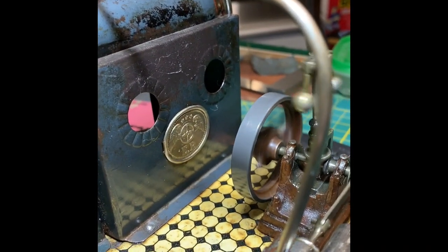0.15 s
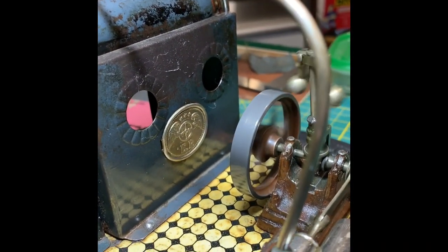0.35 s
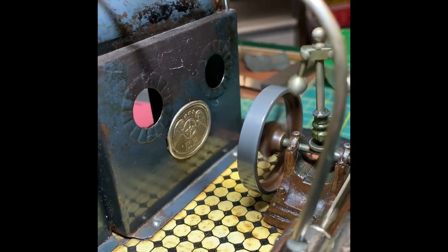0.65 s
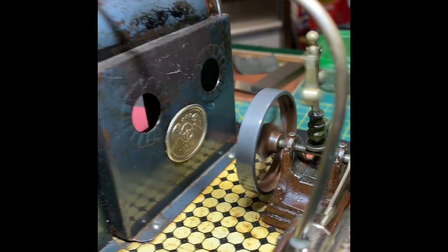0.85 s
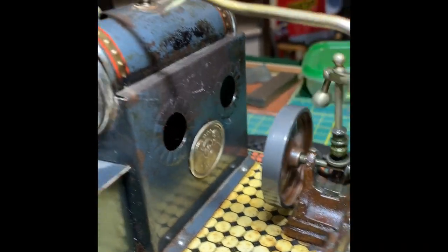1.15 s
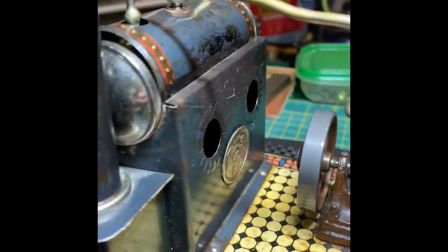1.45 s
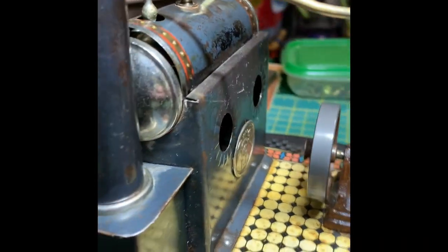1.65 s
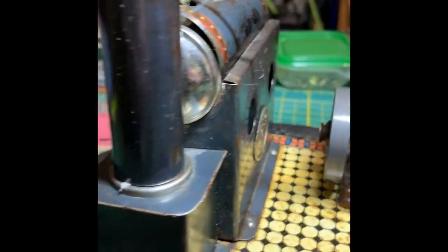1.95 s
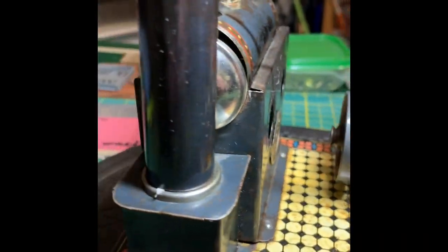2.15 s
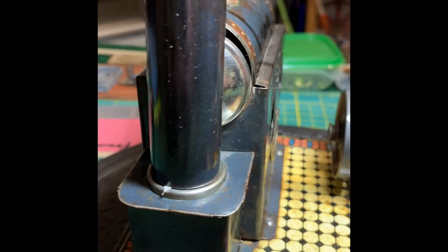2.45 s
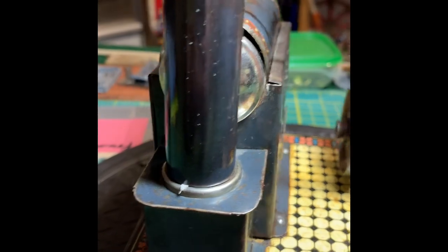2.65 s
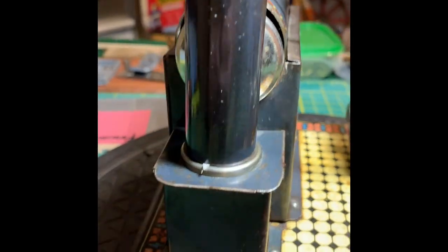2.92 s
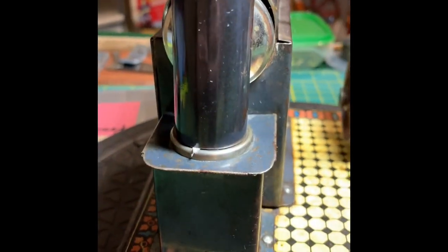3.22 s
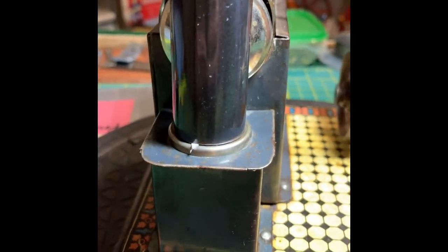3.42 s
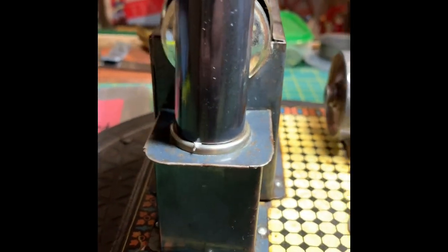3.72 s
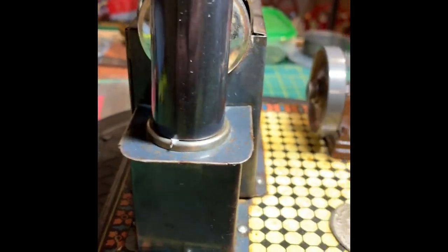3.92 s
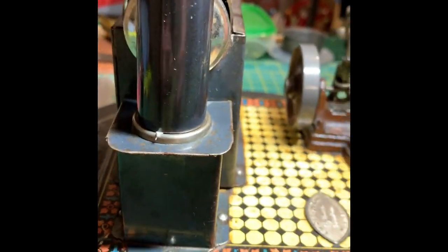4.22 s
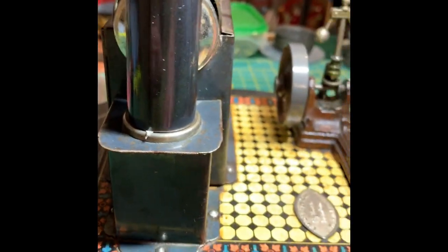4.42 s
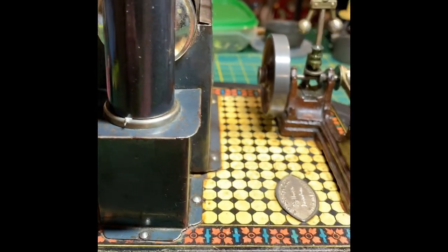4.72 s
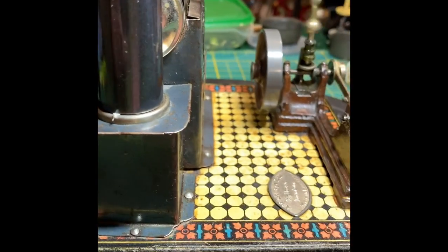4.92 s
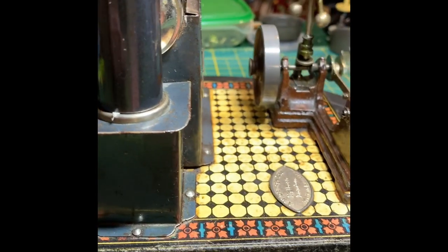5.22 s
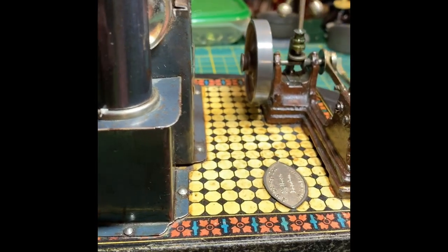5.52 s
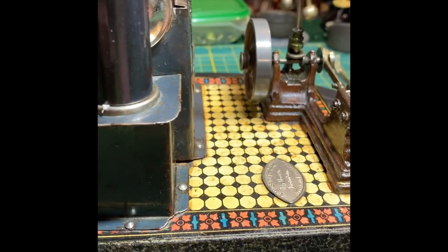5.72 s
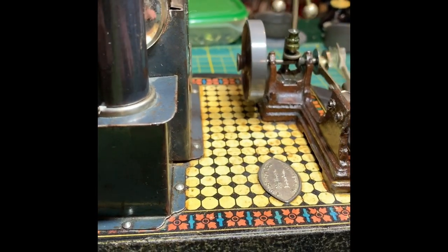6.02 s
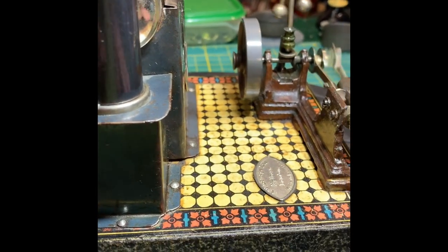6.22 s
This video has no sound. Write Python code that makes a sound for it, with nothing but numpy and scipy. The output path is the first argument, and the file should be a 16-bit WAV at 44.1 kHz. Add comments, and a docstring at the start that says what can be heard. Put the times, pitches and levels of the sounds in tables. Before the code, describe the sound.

Rapid, even metallic knocks and hissing puffs of air from a toy steam engine running close by on a workbench.

```python
"""A toy steam engine runs on compressed air on a workbench, at about 15 turns a second. In every turn the loose
crank knocks and rings the tin base, the exhaust lets out a chuff of air, the valve spits and the bench takes a
soft thump. Under it lie a steady leak, a low rumble and a few faint low tones. A stereo microphone moves from
beside the boiler to behind the chimney."""
import sys
import numpy as np
from scipy import signal
from scipy.fft import rfft, irfft, next_fast_len
from scipy.io import wavfile
from scipy.ndimage import uniform_filter1d, minimum_filter1d, map_coordinates

SR = 44100
rng = np.random.default_rng(int(sys.argv[2]) if len(sys.argv) > 2 else 0)


def wrap_up_sound(samples):
    """Save the sound to the file named by the first command line argument, as 16-bit audio."""
    columns = np.atleast_2d(samples).T
    # keep every value between -1 and 1, then stretch to whole-number steps
    tamed = np.clip(columns, -1, 1)
    steps = np.round(tamed * 32767).astype(np.int16)
    wavfile.write(sys.argv[1], SR, steps)


N = 280917

# How fast the flywheel spins. Each row: time in seconds, turns per second.
FLYWHEEL_SPEED = [(0.0, 15.2), (0.067, 15.448), (0.786, 14.935), (2.842, 15.132), (4.112, 14.891),
                  (4.848, 15.013), (5.076, 15.214), (5.912, 14.804)]
# The microphone's path. Each row: time in seconds, place (0 beside the boiler, 1 behind the chimney),
# distance in metres.
MIC_PATH = [(0, 0, 0.17), (1, 0.1, 0.22), (1.8, 0.81, 0.2), (3.2, 1, .2), (4.6, 0.92, 0.27), (5.1, 1, 0.24),
            (6.3, 0.94, 0.26)]
# The steady leak and the workshop's rumble. Each row: frequency in Hz, level in dB.
AIR_COLOUR = [(25, 0.5), (38, -4), (58, 5.5), (120, -3.5), (160, -7), (250, -5), (600, -5.5), (1000, -9.5),
              (2000, -10.5), (2700, -17), (3800, -17.5), (6000, -29), (10000, -20.5), (16000, -50)]
# A few faint, steady low tones. Each row: pitch in Hz, level in dB.
HUM_TONES = [(302, -44.5), (360, -46), (436, -48.5)]
# The hits of rod, crank and bearings in one turn. Each row: delay from the turn's start in seconds,
# level in dB, brightness in dB per octave.
CRANK_HITS = [(-.0248, -26, 4.5), (-.01708, -20, 5), (-.00941, -10, 2.5), (-.00735, -5, -3),
              (-.00483, -11, -3), (-.00371, 1.06, 1.63), (.00301, -12, 1.7), (.02353, -27, -8.5)]
# A few high tones that ring on after each hit. Each row: pitch in Hz, width in Hz (narrow rings longer), level
# in dB.
HIGH_RINGS = [(1970, 14, 5), (3680, 43, 0), (3788, 7.1, 4.5), (3830, 10, -2), (4773, 120, 0),
              (6910, 79, 2)]
# How the tin base and boiler house ring. Each row: pitch in Hz, width in Hz, level in dB beside
# the boiler, level in dB behind the chimney.
TIN_TONES = [(194.4, 31, 0, 2.5), (323.6, 99, -8.5, -1.2), (341.5, 49, -8.5, 0), (435.9, 17.3, 10, 12.5),
             (526, 209, 11, 11.5), (546.7, 121.3, 16, 15.5), (655.6, 40, 20, 18.5), (797.2, 59.6, 7.5, 6),
             (934.5, 38.6, 4, 0.7), (1101, 20, -15, -1), (1172, 52, 0.5, 1.5), (1288.5, 42, -3, 7.5),
             (1560, 37.4, 3.5, 2.5), (1724, 16.6, 1.5, 0.5), (1834, 158, 3, -0.5), (1872, 16, 1, -2.5),
             (1954, 63, -31, -8), (2161, 111, 10.5, 3), (2227, 105, 2.5, -8)]
# The exhaust's first burst, main rush and last leak. Each row: delay from the turn's start in seconds,
# level in dB, then rise, hold and fall in seconds.
EXHAUST_PUFFS = [(-.0042, -2, .008, 0.00046, 0.01), (-.0035, -7, 0.035, 0.014, 0.044),
                 (.0325, -24, 0.021, .003, 0.073)]
# The exhaust's hiss. Each row: frequency in Hz, level in dB.
CHUFF_COLOUR = [(250, -15), (450, -1), (620, 0), (1000, -8), (2050, -8), (2450, -8), (3800, -12),
                (5200, -8), (6300, -2.5), (7000, -4.5), (9000, -9), (11000, -13), (14000, -12),
                (16000, -22.5)]
# How that hiss changes behind the chimney. Each row: frequency in Hz, change in dB.
CHIMNEY_SHADE = [(2500, 0), (3800, -0.5), (4700, 1), (5600, -2), (7000, -4.5), (10000, -2), (14000, -4.5)]
# The valve's one jet per turn. Its row reads like those of EXHAUST_PUFFS.
VALVE_PUFFS = [(.0178, 0, .0035, .0017, .0065)]
# The valve's hiss. Each row: frequency in Hz, level in dB.
SPIT_COLOUR = [(2000, -20.5), (5000, -20.5), (7000, -15.5), (8500, -11.5), (9700, -0.8), (11000, -2.5),
               (12500, -6.5), (14000, -14), (15200, -19), (16500, -38)]
# Spits that stand out, nearly all louder. Each row: time in seconds, change in dB.
SPIT_ACCENTS = [(1.35, 2.5), (1.94, 3.5), (3.94, 6.5), (4.81, 4.5), (5.27, 3.5), (5.8, -1), (6.14, 1.5)]
# How the bench top booms. Each row: pitch in Hz, width in Hz, level in dB.
BENCH_TONES = [(72.5, 22.5, 6.5), (109.8, 15.3, 2.5), (204, 18, -2)]
# How much louder the microphone's left side is. Each row: frequency in Hz, left minus right in dB.
LEFT_LOUDER = [(60, -1), (110, 0), (200, -1), (380, -1.5), (700, -7), (1290, -4), (2380, -0.5), (4400, 0.5),
               (8120, 0), (15000, 0.5)]
# How far the wave on the left runs ahead. Each row: frequency in Hz, lead in radians.
LEFT_AHEAD = [(0, 0), (400, -.3), (860, -1), (1120, -.1), (2150, 1), (2410, 2), (3270, 1.9), (3790, 1.1),
              (4600, 1.9), (5400, 3.1), (7670, 6), (9000, 6.6), (11700, 9.4), (13000, 10.5), (14500, 12.3),
              (16200, 12.7)]
# The workshop's echo. Each row: frequency in Hz, seconds to fade by 60 dB.
ROOM_FADE = [(150, 0.14), (1500, 0.13), (12000, 0.067)]


def amp(db):
    """Turn decibels into a number to multiply by."""
    return 10 ** (np.asarray(db) / 20)


def along(points, hz):
    """Read a table of (Hz, value) rows at any frequency, on a log scale."""
    freqs, values = np.transpose(points)
    return np.interp(np.log(hz + 1), np.log(freqs + 1), values)


def curves(rows):
    """Give one value per sample for each column after the time."""
    seconds, *columns = np.transpose(rows)
    return [np.interp(np.arange(N) / SR, seconds, column) for column in columns]


def wobble(rate):
    """Draw a smooth curve through `rate` random points a second."""
    points = rng.standard_normal(int(N * rate / SR) + 4)
    return map_coordinates(points, [np.arange(N) * rate / SR])


def filtered(x, response):
    """Scale and shift each frequency of x by response(hz)."""
    size = next_fast_len(N + SR // 2)
    return irfft(rfft(x, size) * response(np.fft.rfftfreq(size, 1 / SR)), size)[..., :N]


def noise(colour):
    """Make noise of the given colour, with an average (rms) size of 1."""
    hiss = filtered(rng.standard_normal(N), lambda hz: amp(along(colour, hz)))
    return hiss / np.sqrt(np.mean(hiss ** 2) + 1e-20)


def ringing(tones, hz):
    """A struck object answers most strongly near its own tones."""
    return sum((-1) ** k * amp(db) * 1j * hz * width / (pitch ** 2 - hz ** 2 + 1j * hz * width)
               for k, (pitch, width, db) in enumerate(tones))


def turn_starts():
    """Find when each turn starts, with the piston at the end of its stroke."""
    turns = np.cumsum(curves(FLYWHEEL_SPEED)[0]) / SR - .035
    return np.interp(np.arange(int(turns[-1]) + 1), turns, np.arange(N) / SR)


def clicks(times, scatter_db, scatter_s):
    """Put one click at each time, a little uneven in size and timing."""
    size, slip = rng.standard_normal((len(times), 2)).T
    at = np.round((times + scatter_s * slip) * SR).astype(int)
    inside = (at >= 0) & (at < N)
    return np.bincount(at[inside], amp(scatter_db * size[inside]), N)


def airflow(times, puffs, scatter_db, scatter_s):
    """Repeat the puffs in every turn: each rises by 60 dB, holds and falls by 60 dB."""
    reach = SR // 15
    t = np.arange(-reach, reach) / SR
    flow = 0
    for start, db, rise, hold, fall in puffs:
        before, after = np.maximum(start - t, 0), np.maximum(t - start - hold, 0)
        flow = flow + amp(db - 60 * before / rise - 60 * after / fall)
    return signal.fftconvolve(clicks(times, scatter_db, scatter_s), flow)[reach:][:N]


def leak_and_rumble():
    """Air leaks steadily over the workshop's rumble; above the bass, some comes from all sides."""
    left_right = np.array([noise(AIR_COLOUR), noise(AIR_COLOUR)])
    all_round = filtered(left_right, lambda hz: hz / (hz + 250))
    return amp(-34 + 0.56 * wobble(25)) * stereo_mic(noise(AIR_COLOUR)) + amp(-37.5) * all_round


def low_tones():
    """A few faint low tones sound steadily, wavering a little in level and pitch."""
    t = np.arange(N) / SR
    hum = 0
    for hz, db in HUM_TONES:
        level = np.sqrt(2) * amp(db + .8 * wobble(2.9))
        hum = hum + level * np.sin(2 * np.pi * hz * t + 0.6 * wobble(4))
    return hum


def crank_knocks(times, place):
    """The loose parts hit several times a turn; each hit rings the tin and, faintly, a few high tones."""
    force = 0
    for delay, db, brightness in CRANK_HITS:
        colour = lambda hz: amp(db + brightness * np.log2(np.maximum(hz, 300) / 1000))
        hits = clicks(times, scatter_db=0.55, scatter_s=.00003)
        force = force + filtered(hits, lambda hz: colour(hz) * np.exp(-2j * np.pi * hz * delay))
    high_rings = amp(-11.5) * filtered(force, lambda hz: ringing(HIGH_RINGS, hz))
    force = filtered(force, lambda hz: 1 / (1 + (hz / 4000) ** 4))  # thin tin takes up little treble
    tin = np.array(TIN_TONES)
    boiler_side = filtered(force, lambda hz: ringing(tin[:, [0, 1, 2]], hz))
    chimney_side = filtered(force, lambda hz: ringing(tin[:, [0, 1, 3]], hz))
    return (1 - place) * boiler_side + place * chimney_side + high_rings


def exhaust_chuff(times, place):
    """The exhaust snaps open and air rushes out of the cylinder; the chimney shades the hiss."""
    puffs = airflow(times, EXHAUST_PUFFS, scatter_db=1.14, scatter_s=.0001) * noise(CHUFF_COLOUR)
    shaded = filtered(puffs, lambda hz: amp(along(CHIMNEY_SHADE, hz)))
    return (1 - place) * puffs + place * shaded


def valve_spit(times):
    """A short, high jet sputters past the valve; oil makes every spit a little different."""
    hiss = noise(SPIT_COLOUR)
    treble = filtered(hiss, lambda hz: 1 / (1 + (12000 / (hz + 1)) ** 16))
    hiss = hiss - treble + amp(-0.5 + 3.8 * wobble(11)) * treble  # now brighter, now duller
    sputter = amp(1.3 * wobble(900))
    t = np.arange(N) / SR
    half_turn = np.diff(times).mean() / 2
    accent_db = sum(db * (np.abs(t - when) < half_turn) for when, db in SPIT_ACCENTS)
    jets = airflow(times, VALVE_PUFFS, scatter_db=1.4, scatter_s=0.000084)
    return amp(accent_db) * jets * sputter * hiss


def bench_thump(times):
    """The returning piston softly rocks the engine on the bench, which is too stiff for deep bass."""
    pushes = clicks(times + .0225, scatter_db=0.5, scatter_s=0.00058)
    bench = lambda hz: sum(ringing([tone], hz) for tone in BENCH_TONES)
    bass_band = lambda hz: 1 / (1 + (45 / (hz + 1)) ** 6) / (1 + (hz / 170) ** 4)
    return amp(19.5) * filtered(pushes, lambda hz: bench(hz) * bass_band(hz))


def stereo_mic(x):
    """The microphone's two sides hear a sound with different level and timing."""
    def left_and_right(hz):
        lead = np.interp(hz, *np.transpose(LEFT_AHEAD))
        left = amp(along(LEFT_LOUDER, hz) / 2) * np.exp(.5j * lead)
        return np.array([left, 1 / left])  # each side takes half of the difference
    return filtered(x, left_and_right)


def engine_echoes(x):
    """Boiler, chimney and base bounce the hiss about for 20 ms, differently to each side."""
    t = np.arange(SR // 50) / SR
    echoes = rng.standard_normal((2, len(t))) * amp(-60 * t / 0.033)
    return signal.fftconvolve(x[None], echoes / np.linalg.norm(echoes[0]), axes=1)[:, :N]


def workshop_echo(x):
    """The room adds a short wash of echoes whose treble fades first."""
    hz, t, spectrum = signal.stft(rng.standard_normal((2, SR // 3)), SR, nperseg=256)
    fade = amp(-60 * t / along(ROOM_FADE, hz)[:, None])
    tail = signal.istft(spectrum * fade, SR, nperseg=256)[1]
    return signal.fftconvolve(x[None], tail / np.linalg.norm(tail[0]), axes=1)[:, :N]


def scene():
    """Mix it all: one crank times the knock, chuff, spit and thump while the microphone moves round."""
    times = turn_starts()
    place, metres = curves(MIC_PATH)
    place = np.clip(place, 0, 1)
    nearness = .2 / metres  # 1 at 20 cm
    # The dB taken off with `place` is the chimney's shade.
    knock = nearness * amp(18.5 - 0.22 * place) * crank_knocks(times, place)
    chuff = amp(-17.5 - 0.94 * place) * exhaust_chuff(times, place)  # spreads all round the engine
    spit = nearness * amp(-11 - 3 * place) * valve_spit(times)
    hum = amp(-6 * (1 - place)) * low_tones()  # clearer on the chimney side
    direct = stereo_mic(knock + chuff + spit + bench_thump(times) + hum)
    bounced = engine_echoes(amp(-9) * chuff + amp(-17) * spit)
    room = workshop_echo(amp(-16.5) * knock + amp(-21) * chuff + amp(-20) * spit)
    return direct + bounced + room + leak_and_rumble()


def record(dry):
    """Turn the level down briefly at any peak that is too loud, then cut the highest treble."""
    ceiling, top_hz = .96, 16200
    needed = np.minimum(1, ceiling / (np.abs(dry).max(axis=0) + 1e-9))
    gain = uniform_filter1d(minimum_filter1d(needed, size=200), size=200)
    return filtered(dry * gain, lambda hz: hz < top_hz)


dry = scene()
out = record(dry)
wrap_up_sound(out)
```